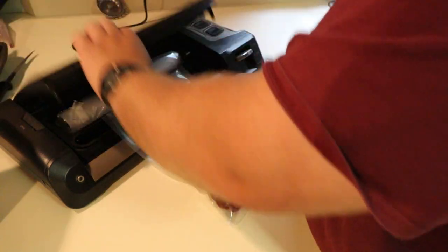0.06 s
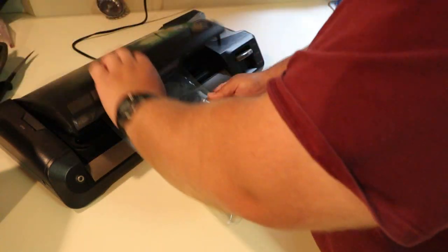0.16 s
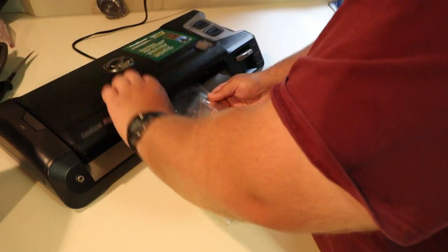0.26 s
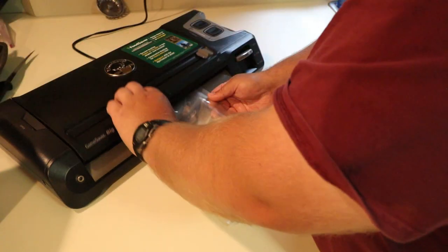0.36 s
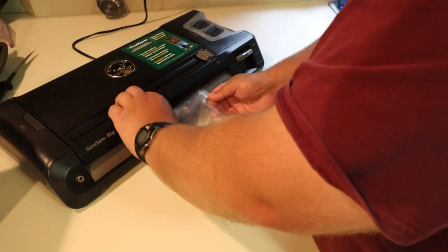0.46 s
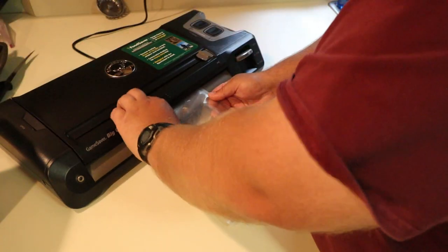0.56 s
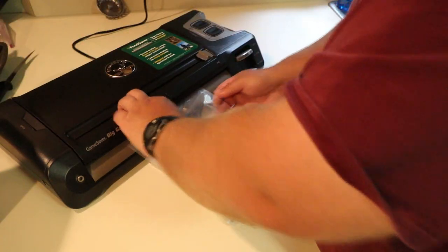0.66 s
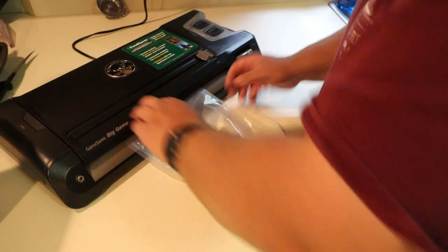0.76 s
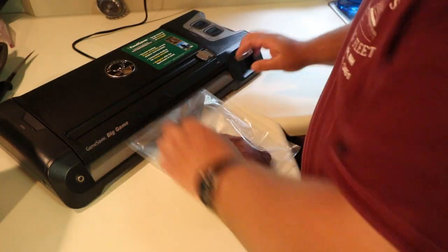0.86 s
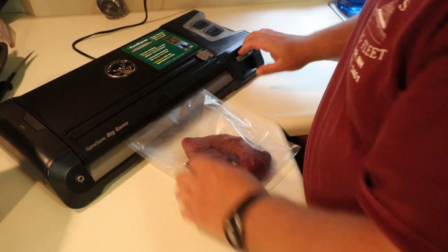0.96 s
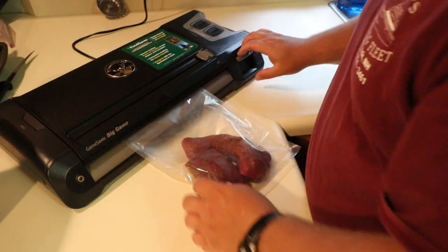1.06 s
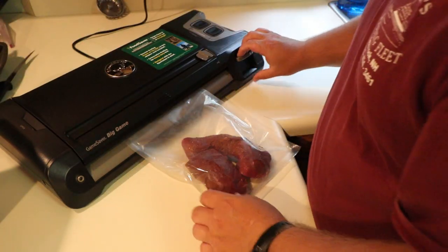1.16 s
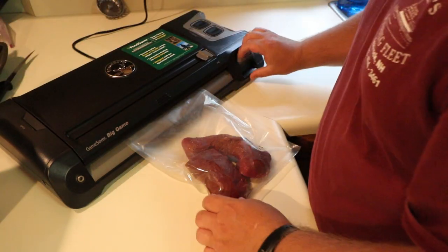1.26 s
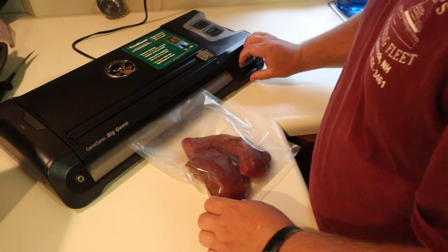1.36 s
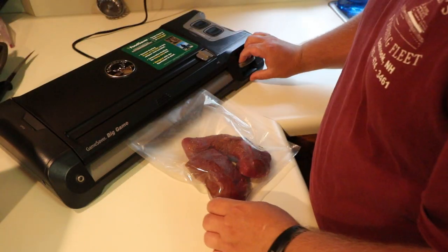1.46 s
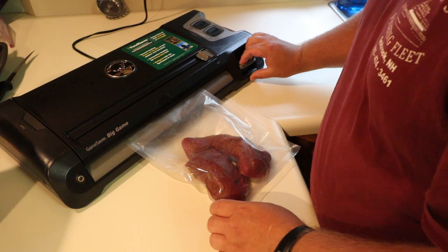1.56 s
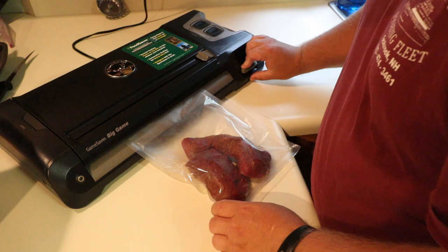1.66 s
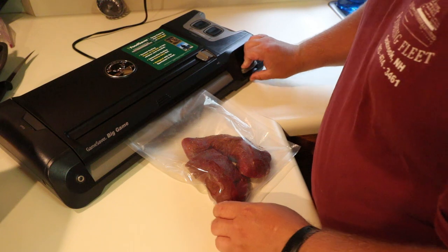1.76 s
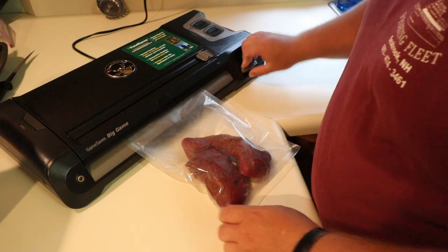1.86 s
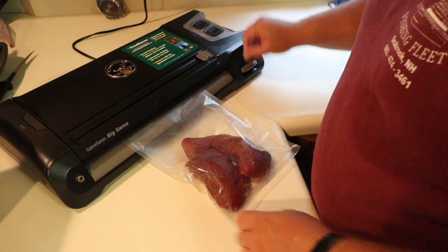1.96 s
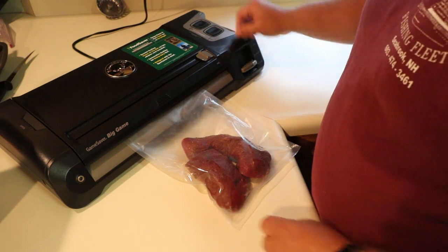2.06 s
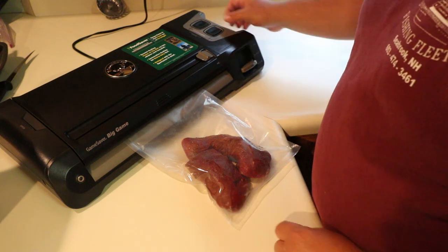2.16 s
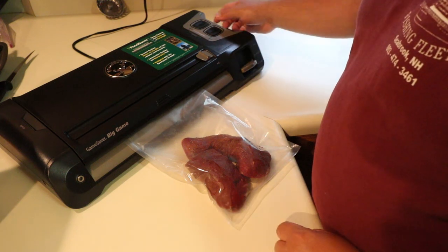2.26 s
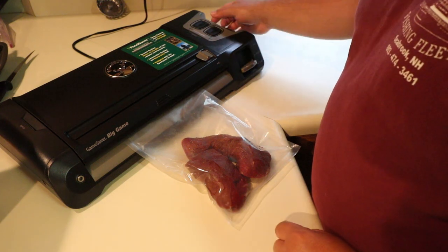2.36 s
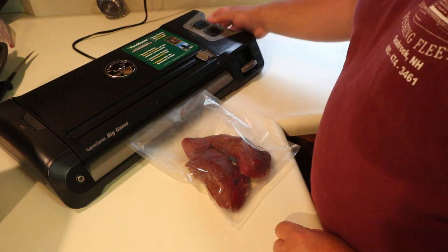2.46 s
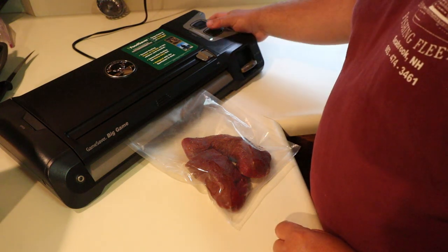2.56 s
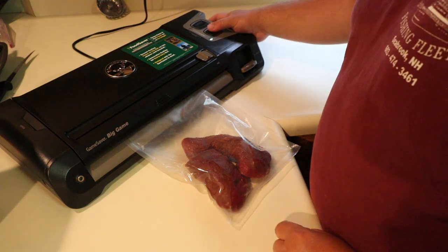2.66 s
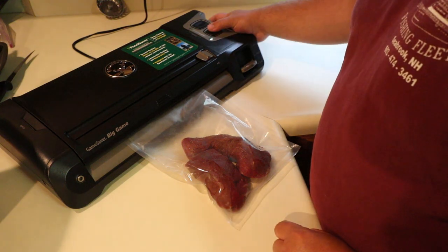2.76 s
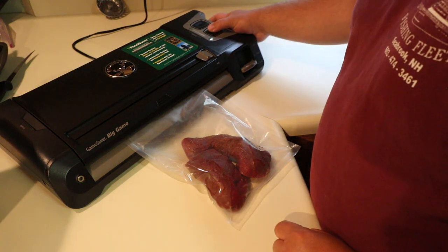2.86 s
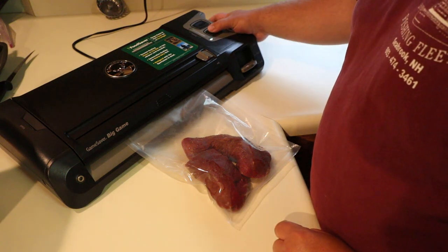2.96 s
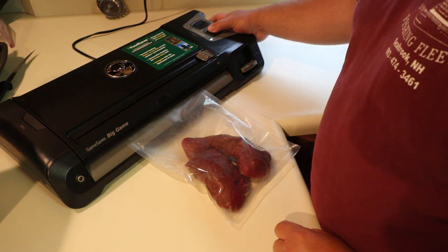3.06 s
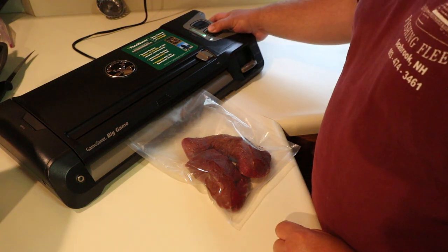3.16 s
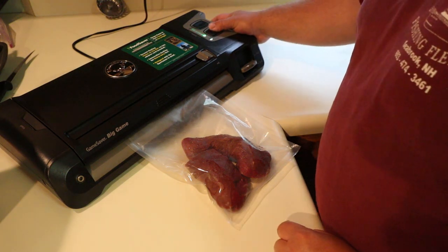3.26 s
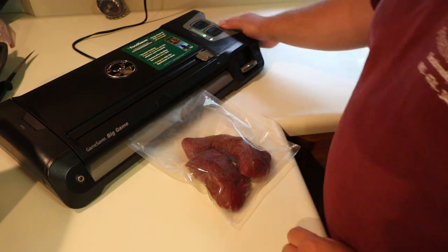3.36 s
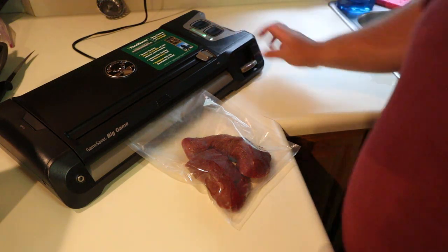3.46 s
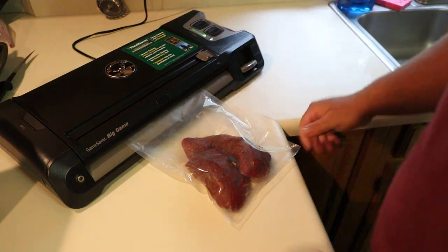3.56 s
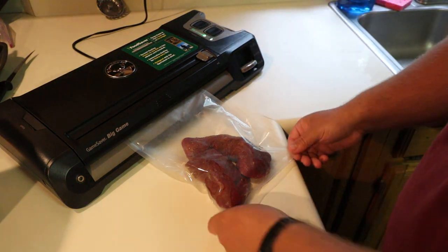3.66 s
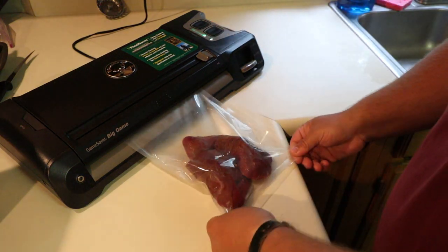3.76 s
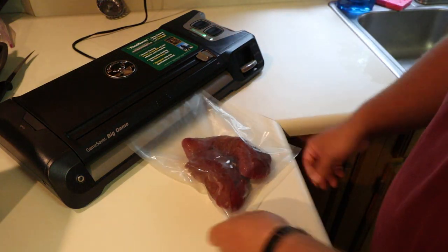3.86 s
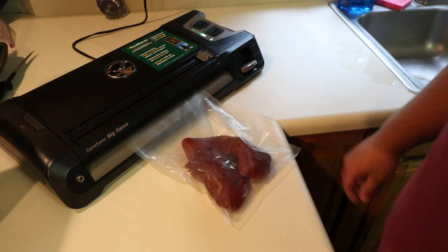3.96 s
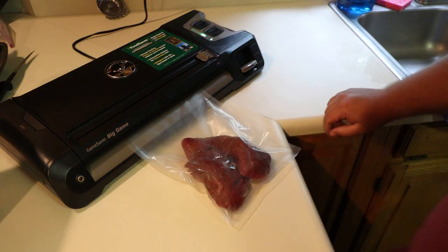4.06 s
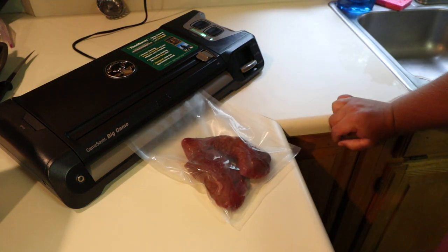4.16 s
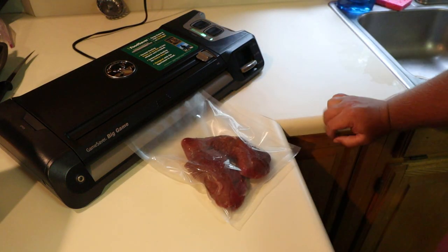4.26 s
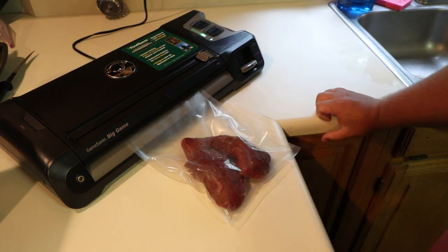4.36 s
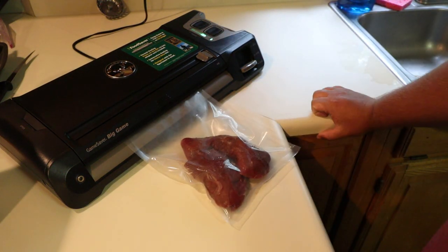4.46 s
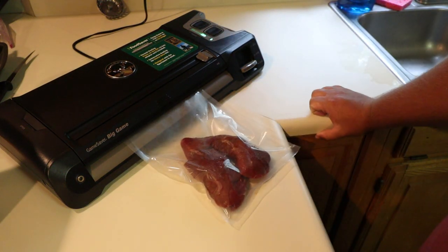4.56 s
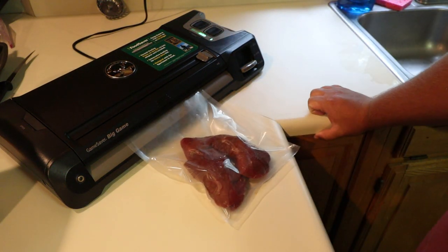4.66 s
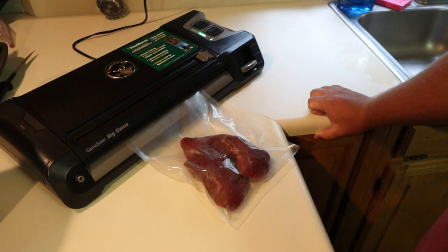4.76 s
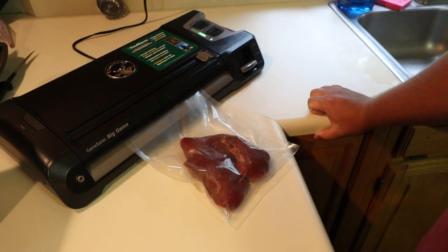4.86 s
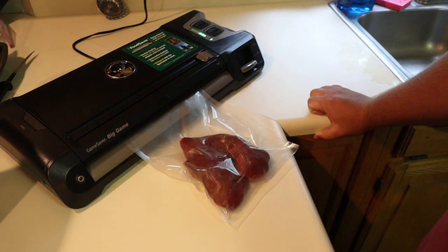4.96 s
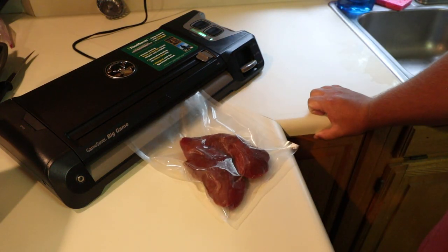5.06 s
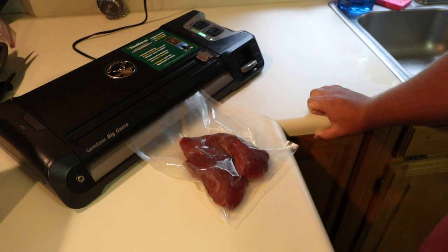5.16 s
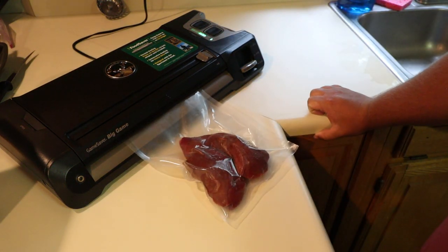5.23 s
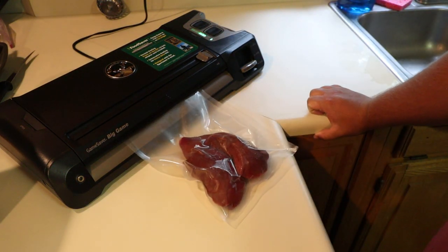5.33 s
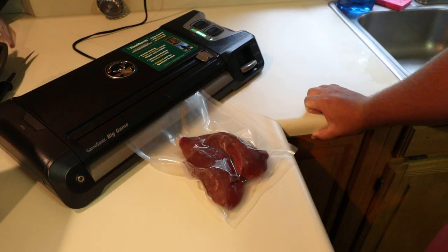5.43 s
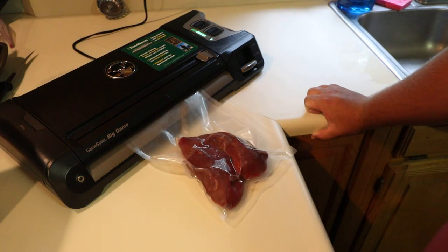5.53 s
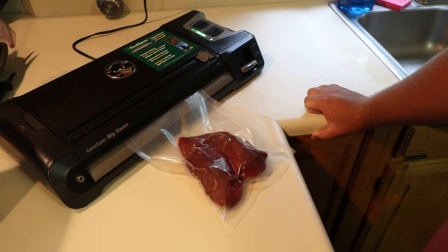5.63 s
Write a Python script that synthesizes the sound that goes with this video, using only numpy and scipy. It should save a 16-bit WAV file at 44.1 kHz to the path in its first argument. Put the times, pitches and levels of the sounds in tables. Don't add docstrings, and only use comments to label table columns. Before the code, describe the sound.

Hands fumble a plastic bag under a lid, a stiff latch clacks loudly, and a vacuum sealer motor starts its rattling electric hum.

```python
import sys
import numpy as np
from scipy import signal
from scipy.fft import rfft, irfft
from scipy.io import wavfile
from scipy.ndimage import uniform_filter1d

SR = 44100
rng = np.random.default_rng(int(sys.argv[2]) if len(sys.argv) > 2 else 0)


def log_audio(samples):
    frames = np.atleast_2d(samples).T
    limited = np.clip(frames, -1, 1)
    pcm = np.round(limited * 32767).astype(np.int16)
    wavfile.write(sys.argv[1], SR, pcm)


def invert_db(level):
    return 10 ** (np.asarray(level, dtype=float) / 20)


N = 251149
TIME = np.arange(N) / SR


def level(x, db):
    return x * invert_db(db) / np.sqrt(np.mean(x ** 2) + 1e-30)


def band(x, lo_hz, hi_hz):
    return signal.sosfilt(signal.butter(2, [lo_hz, hi_hz], "bandpass", fs=SR, output="sos"), x)


def decay(t, t60):
    return np.exp(-np.log(1000) * t / t60)


def ring(x, modes):
    out = 0
    for hz, db, t60 in modes:
        pole = np.exp(2j * np.pi * hz / SR - np.log(1000) / (t60 * SR))
        out = out + invert_db(db) * signal.lfilter([1], [1, -pole], x).imag
    return out


def coloured(points):
    hz, db = np.transpose(points)
    log_hz = np.log(np.fft.rfftfreq(N, 1 / SR) + 1)
    gain = invert_db(np.interp(log_hz, np.log(hz), db, left=-90))
    return level(irfft(rfft(rng.standard_normal(N)) * gain, N), 0)


def clicks(times, sizes):
    out, place = np.zeros(N + 64), times * SR
    index = np.floor(place).astype(int)[:, None] + np.arange(-7, 9)
    off = index - place[:, None]
    pulse = np.sinc(off) * np.cos(np.pi * off / 16) ** 2
    np.add.at(out, np.clip(index, 0, N + 63), sizes[:, None] * pulse)
    return out[:N]


def add(out, s, sound, peak_db):
    i = int(s * SR)
    out[i:i + len(sound)] += (sound * invert_db(peak_db) / np.abs(sound).max())[:N - i]


def burst(rise_s, t60, noise):
    t = np.arange(len(noise)) / SR
    return noise * (1 - np.exp(-t / rise_s)) * decay(t, max(t60, .004))


# t/s, turn rate f/Hz, level/dB of air through the inlet valve
PUMP_RUN = [(3.27, 115.0, -35), (3.3, 116.0, -37.5), (3.36, 116.0, -36.5), (3.44, 115.4, -29),
            (3.6, 114.8, -30.5), (3.83, 114.3, -34.5), (4.01, 114.3, -34.5), (4.29, 113.5, -41.5),
            (4.85, 112.9, -44.5), (5.26, 113.0, -38), (5.68, 113.2, -31.5)]
# t/s, strength [0-1]
AIR_GULPS = [(3.28, 0.9), (3.34, 0.3), (3.385, 0.63), (3.45, .3), (3.55, 0.4), (3.68, 0.5), (3.8, 0.5),
             (3.85, 0.1), (3.93, 0.8), (4.02, .4), (4.14, 0.4), (4.19, 0.6), (4.35, .4), (4.52, 0.3),
             (4.92, .3), (5.05, .4), (5.22, .4)]
# t/s, t/s
EMPTYING = (3.6, 4.7)


def pump():
    s, *columns = np.transpose(PUMP_RUN)
    hz, inlet_db = (np.interp(TIME, s, c) for c in columns)
    vacuum = np.interp(TIME, EMPTYING, (0, 1))
    full_db = inlet_db + 36
    piston_db = -39.5 - 0.95 * (1 - vacuum) * np.maximum(full_db, 0)
    cold = np.exp(-np.maximum(TIME - s[0], 0) / .2)
    exhaust_db = -39 - 6 * cold + .15 * vacuum * full_db
    linkage_db = -43.5 - 5 * cold + 2 * np.sin(np.pi * vacuum)
    inlet_lag_ms = 3.5 + .06 * np.maximum(-39.5 - inlet_db, 0)
    exhaust_lag_ms = 1.3 - 0.383 * vacuum
    loose = 0.085 + sum(strength * np.exp(-((TIME - gulp_s) / 0.017) ** 2) for gulp_s, strength in AIR_GULPS)

    running = TIME >= s[0]
    turns = np.cumsum(hz * running) / SR
    when = np.interp(np.arange(int(turns[-1]) + 1), turns[running], TIME[running])
    at = (when * SR).astype(int)
    chance = rng.standard_normal((len(when), 5)).T
    knocks = piston(when, piston_db[at], chance[0:2])
    knocks = knocks + exhaust_valve(when + exhaust_lag_ms[at] / 1000, exhaust_db[at], chance[2:4])
    knocks = knocks + inlet_valve(when + inlet_lag_ms[at] / 1000, inlet_db[at], loose[at] * chance[4])
    knocks = band(band(band(knocks, 720, 5500), 720, 21000), 720, 22000)
    knocks = knocks + invert_db(6) * band(band(linkage(when, linkage_db[at]), 4100, 13600), 4000, 21000)
    spin_up = np.clip((TIME - s[0]) / .03, 0, 1)
    return knocks + spin_up * (shaking(turns, vacuum) + air(turns, vacuum, loose))


# f/Hz, level/dB, t60/s
PISTON_MODES = [(793, -3.5, 0.034), (886, -5, 0.027), (996, 0.5, 0.022), (1136, -2.5, 0.013),
                (1300, -2, 0.018), (1612, -3, 0.029), (2224, -18, 0.024), (2300, -9, 0.014),
                (2608, -4, 0.037)]


def piston(when, db, chance):
    knocks = clicks(when + 4e-6 * chance[0], invert_db(db + 0.15 * chance[1]))
    return invert_db(9) * ring(knocks, PISTON_MODES)


# f/Hz, level/dB, t60/s
EXHAUST_MODES = [(2734, -2, 0.0075), (3158, -7, 0.019), (3293, -1, 0.035), (3417, -3, 0.032),
                 (3590, -5, 0.027), (4260, -12, .025)]


def exhaust_valve(when, db, chance):
    slaps = clicks(when + 6e-6 * chance[0], invert_db(db + 0.2 * chance[1]))
    return invert_db(9.5) * ring(slaps, EXHAUST_MODES)


# f/Hz, level/dB, t60/s
INLET_MODES = [(1480, -7.5, 0.01), (2105, -3.5, 0.024), (2382, -10, 0.06), (2480, 0.5, 0.021),
               (2650, -6.5, 0.018), (3410, -8, 0.023), (5630, -1.5, 0.0041)]


def inlet_valve(when, db, stumble):
    return invert_db(3) * ring(clicks(when, invert_db(db + 5.2 * stumble)), INLET_MODES)


# f/Hz, level/dB, t60/s
LINKAGE_MODES = [(4590, -10.5, 0.012), (5330, -3.5, 0.014), (6090, -7.5, 0.011), (6580, -11.5, 0.015),
                 (7260, 1.5, 0.0043), (7750, 1.5, 0.0063), (8730, -5.5, 0.013), (10180, -17.5, 0.019),
                 (11800, -18, .01), (13550, -28, 0.0077)]


def linkage(when, db, count=12, span_ms=5.9):
    def slew(v):
        return uniform_filter1d(v, size=50, axis=0)

    start_ms = np.append(0, rng.uniform(0, span_ms, count - 1))
    drift = slew(slew(rng.standard_normal((len(when), count)))) * np.sqrt(75)
    chance = rng.standard_normal((2, len(when), count))
    lag_ms = start_ms + .05 * drift * (start_ms > 0) + .005 * chance[0]
    wobble_db = 1.5 * drift[::-1] + .8 * chance[1]
    size = invert_db(db[:, None] - 3.7 * start_ms + wobble_db) * (-1) ** np.arange(count)
    times = when[:, None] + lag_ms / 1000
    return ring(clicks(times.ravel(), size.ravel()), LINKAGE_MODES)


# multiple of the turn rate, level/dB
SHAKE_FULL = [(1, -7), (2, -19), (3, 0.5), (4, -10), (5, -9), (6, -12.5), (7, -22)]
# multiple of the turn rate, level/dB
SHAKE_EMPTY = [(1, -6.5), (2, -9.5), (3, -1.5), (4, -1), (5, -73), (6, -15), (7, -48)]


def shaking(turns, vacuum):
    out = np.zeros(N)
    for (k, full_db), (_, empty_db) in zip(SHAKE_FULL, SHAKE_EMPTY):
        size = invert_db(full_db + (empty_db - full_db) * vacuum)
        out += size * np.cos(2 * np.pi * k * turns + k * k)
    return invert_db(-44) * out


# f/Hz, level/dB
AIR_HISS = [(150, -11), (500, -8), (1200, -3), (2500, 2), (3400, -13), (4500, -12), (7500, -15), (9000, -3),
            (12000, -8), (15500, -21)]


def air(turns, vacuum, loose):
    puffs = (.3 + np.exp(-(turns % 1) / .4)) * coloured(AIR_HISS) * invert_db(-50 - 3 * vacuum)
    hiss = band(band(rng.standard_normal(N), 2100, 2900), 2100, 2900)
    return puffs + invert_db(-41) * loose * level(hiss, 0)


# t/s, body peak level/dB, crack level/dB above body, ring t60/s
LID_KNOCKS = [(0.009, -42, -23, 0.027), (0.045, -39, -7, 0.062), (0.177, -45.5, -6, 0.067),
              (0.21, -29, 1.5, 0.031), (0.356, -38, -25, 0.08), (0.379, -45.5, -12, 0.056),
              (0.401, -49, 3, 0.04), (0.414, -37, -9, 0.08), (0.432, -36, 0.5, 0.03),
              (0.559, -46, -32, 0.096), (0.642, -39.5, -9.5, 0.083), (0.664, -54, 0, 0.055),
              (0.798, -44.5, -16, 0.039), (1.021, -37, -1, 0.12), (1.208, -46, -20, 0.13),
              (1.572, -32.5, -11.5, 0.068), (1.599, -54.5, -15, 0.08), (1.645, -39, -22, 0.037),
              (1.945, -25, -20, 0.11), (2.614, -42.5, -9, 0.039), (2.949, -57.5, -22, 0.088),
              (3.207, -24, -3, 0.041)]
# t/s, body peak level/dB, crack level/dB above body, ring t60/s
NAIL_SCRAPES = [(0.787, -44, -3.5, 0.052), (1.034, -39, -4, 0.058), (1.056, -48, 8, .12),
                (1.071, -38.5, 5, 0.076), (1.101, -45, 3.5, 0.08), (1.126, -45.5, -3, .08),
                (1.134, -47, 10.5, 0.016), (2.133, -45.5, 0, 0.13), (2.159, -59, 14.5, 0.077),
                (2.191, -50, 1.5, 0.08), (3.228, -52, 3, 0.056), (1.365, -40, 10, 0.3)]
# t/s, body peak level/dB, crack level/dB above body, ring t60/s,
# fizz level/dB above body
LATCH_SNAPS = [(0.449, -34, -4, 0.076, -31), (.46, -26, -13, 0.042, -39), (.47, -27.5, -6, 0.042, -22),
               (.483, -25.5, -30, 0.11, -46), (1.336, -25.5, -11.5, 0.14, -29.5),
               (1.349, -21, -5.5, 0.14, -11), (1.3545, -9.5, -2, 0.052, -5.5),
               (1.358, -2.5, -11, 0.018, -31), (1.68, -38, -17.5, 0.15, -31.5), (1.696, -21, -4, 0.24, -27),
               (1.7077, -1, -8.5, 0.055, -17), (1.905, -51, 1.5, .1, -26), (1.917, -53.5, -12, 0.029, -14),
               (1.9361, -11.5, -12, 0.05, -29), (3.2523, -36, 4, 0.13, -4.5), (3.2622, -30, 8, 0.026, -28)]
# f/Hz, level/dB, t60/s
CASING_MODES = [(424.4, -0.5, 0.049), (530, -14, 0.017), (721, 2.5, 0.02), (882, 6, 0.01),
                (1078, -3, 0.0398), (1305, -11, 0.022), (1560, -14.5, 0.046), (1740, -8.5, 0.01)]
# f/Hz, level/dB, t60/s
LATCH_MODES = [(397, -19.5, .06), (550, -17, .04), (682, -3.5, .04), (806, -4, 0.017), (867, 5, 0.02),
               (1091, -5, .03), (1250, -4, 0.028), (1500, -12.5, 0.021), (1780, -7.5, 0.044)]


def handling():
    out = np.zeros(N)
    for s, db, crack_db, t60 in LID_KNOCKS:
        knock(out, CASING_MODES, s, db, crack_db, t60, fizz_db=-28 + .4 * crack_db)
    for s, db, crack_db, t60 in NAIL_SCRAPES:
        knock(out, CASING_MODES, s, db, crack_db, t60, fizz_db=-10 + .7 * crack_db)
    for row in LATCH_SNAPS:
        knock(out, LATCH_MODES, *row)
    return out


def knock(out, modes, s, db, crack_db, t60, fizz_db):
    noise = rng.standard_normal((4, SR // 2))
    blow = burst(0.00029, 0.78 * t60, noise[0])
    body = band(ring(blow, modes) + invert_db(27.5) * band(blow, 720, 1600), 380, 2300)
    crack = band(band(burst(.001, .8 * t60, noise[1]), 2200, 4300), 1000, 5000)
    fizz = band(burst(.001, .5 * t60, noise[2]), 4300, 11000)
    add(out, s, echoed(body, noise[3], 400, 1700, near_db=-12.5, t60=0.57), db)
    add(out, s, echoed(crack, noise[3], 1900, 3800, near_db=-16.5, t60=0.59), db + crack_db)
    add(out, s, echoed(fizz, noise[3], 4300, 11000, near_db=-20.5, t60=0.33), db + fizz_db)


def echoed(sound, noise, lo_hz, hi_hz, near_db, t60):
    near, walls = burst(0.0041, 0.14, noise), burst(.02, t60, noise)
    wash = band(near + invert_db(-18.5) * walls, lo_hz, hi_hz)
    return sound / np.abs(sound).max() + invert_db(near_db) * wash / np.abs(wash).max()


# t/s, peak level/dB, slip length/s
FINGER_SLIPS = [(2.2785, -30.5, 0.009), (2.309, -35, 0.0083), (2.353, -42, 0.026), (2.361, -23.5, 0.045),
                (2.385, -29, 0.012), (2.41, -39, 0.023), (2.436, -58, .03), (2.456, -43, 0.014),
                (2.498, -52, 0.051), (2.537, -43.5, 0.1), (2.56, -42, 0.1), (2.585, -43, 0.032),
                (2.707, -55.5, .03)]
# f/Hz, level/dB, t60/s
BUTTON_MODES = [(713, 11.5, 0.04), (1153, -8, 0.054), (1956, -32, .015), (3750, -9.5, 0.03),
                (6030, -24, .006), (8710, -32, .004)]


def button():
    out = np.zeros(N)
    for s, db, length in FINGER_SLIPS:
        rub = burst(0.003, 3.0 * length, rng.standard_normal(SR // 4))
        scuff = invert_db(23) * band(rub, 1500, 4000) - invert_db(4.5) * band(rub, 5000, 12000)
        dryness = min(length / .03, 1)
        add(out, s, band(ring(rub, BUTTON_MODES), 110, 15000) + dryness * scuff, db)
    return out


# t/s, peak level/dB
BAG_CREASES = [
    (3.857, -31),
    (3.92, -34),
    (3.9363, -22),
    (3.9481, -39),
    (5.241, -30),
    (5.2712, -36),
    (5.2968, -27),
    (5.4028, -29),
]


def bag():
    out = np.zeros(N)
    for s, db in BAG_CREASES:
        tick = band(burst(0.00013, 0.01, rng.standard_normal(SR // 20)), 5000, 12000)
        add(out, s, band(tick, 4500, 16000), db + 3.5)
    return out


# t/s, peak level/dB
COUNTER_THUMPS = [(0.0, -50), (0.215, -50), (0.25, -48), (0.365, -45), (.46, -34), (.478, -28), (.575, -46),
                  (.72, -57), (1.04, -41), (1.101, -55), (1.36, -27), (1.44, -44), (1.572, -46),
                  (1.71, -30), (1.79, -44), (1.94, -40)]
# f/Hz, level/dB, t60/s
COUNTER_MODES = [(72.5, 1, 0.37), (50, 0, 0.18), (38.24, -2.5, 0.16)]


def counter():
    out, push = np.zeros(N), burst(0.0087, .1, np.ones(SR // 2))
    swing = band(band(ring(np.diff(push, prepend=0), COUNTER_MODES), 33, 200), 30, 400)
    for s, db in COUNTER_THUMPS:
        thump = band(burst(.005, 0.24, rng.standard_normal(SR // 2)), 100, 270)
        add(out, s, thump, db - .5)
        add(out, s, swing, db - 1.5)
    return out


# t/s, rustle level/dB
BUSY_HANDS = [(0.0, -55), (0.13, -69), (0.38, -60), (0.7, -68), (0.78, -58), (0.84, -66), (1.0, -72),
              (1.39, -58), (1.53, -73), (1.62, -61), (1.74, -75), (1.87, -59), (2.07, -76), (2.31, -72),
              (2.46, -58.5), (2.7, -70.5), (3.0, -82.5), (3.3, -78)]


def shuffle():
    rustle_db = np.interp(TIME, *np.transpose(BUSY_HANDS), right=-120)
    busy_db = rustle_db + 65
    bright_db = -79 + .9 * busy_db
    sway_db = -66 + .4 * busy_db - 2 * TIME + 1.5
    grains = np.repeat(rng.exponential(1, N // 300 + 1), 300)[:N]
    grain = invert_db(2 * uniform_filter1d(grains, size=300))
    dull = level(band(grain * rng.standard_normal(N), 280, 1700), 0)
    bright = level(band(grain * rng.standard_normal(N), 2000, 8500), 0)
    sway = level(band(rng.standard_normal(N), 24, 55), 0)
    return invert_db(rustle_db) * dull + invert_db(bright_db) * bright + invert_db(sway_db) * sway


def kitchen(x, near_t60=0.22, near_db=-14, t60=0.36, wet_db=-24, damp_hz=5000):
    t = np.arange(SR) / SR
    near = band(rng.standard_normal(SR), 290, 12000) * decay(t, near_t60) * (t > .003)
    far = band(rng.standard_normal(SR), 240, damp_hz) * decay(t, t60) * (t > .01)
    tail = invert_db(near_db) * near / np.sqrt(np.sum(near ** 2)) + invert_db(wet_db) * far / np.sqrt(np.sum(far ** 2))
    return x + signal.fftconvolve(x, tail)[:N]


# f/Hz, level/dB per Hz
HOUSE_HUSH = [(35, -27), (60, -5), (81, -6.5), (94, -8.5), (238, -8.5), (294, -4.5), (354, -10.5),
              (715, -13.5), (1310, -30), (16000, -41.5)]


def house():
    return invert_db(-73) * coloured(HOUSE_HUSH)


def scene():
    hands = counter() + handling()
    machine = kitchen(button() + bag() + pump())
    return (hands + machine + shuffle() + house())[None]


def roll_off(x):
    return signal.sosfilt(signal.butter(12, 16420, fs=SR, output="sos"), x)


def record(dry):
    rounded = np.tanh(.5 * dry) / .5
    mix = signal.sosfilt(signal.ellip(8, .2, 60, 16000, fs=SR, output="sos"), rounded)
    return roll_off(mix)


dry = scene()
out = record(dry)
log_audio(out)
```